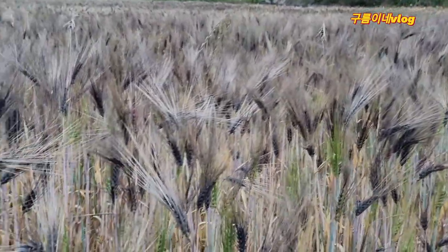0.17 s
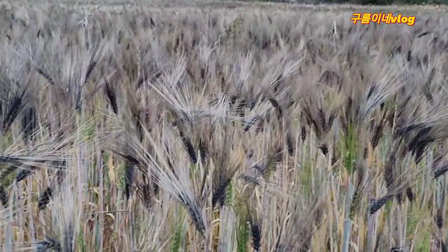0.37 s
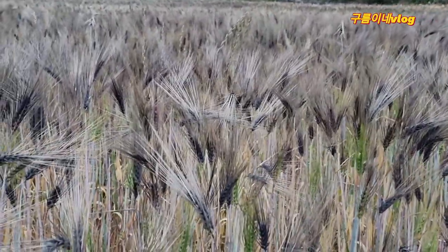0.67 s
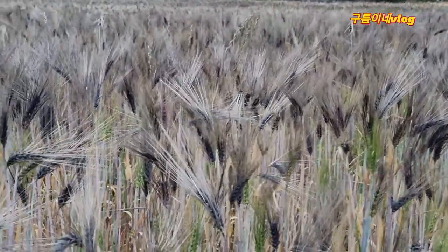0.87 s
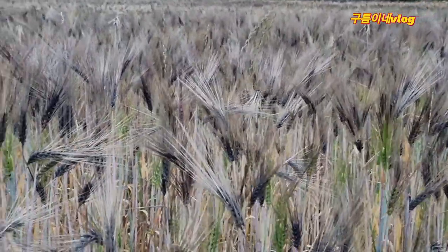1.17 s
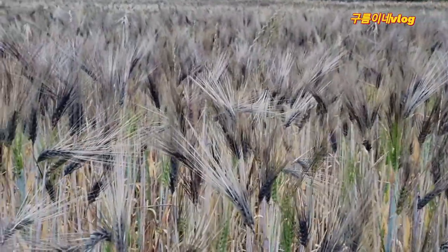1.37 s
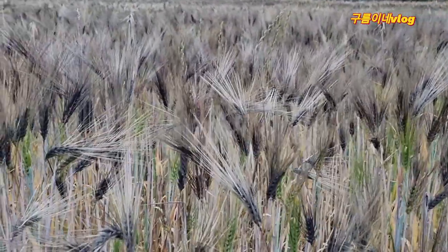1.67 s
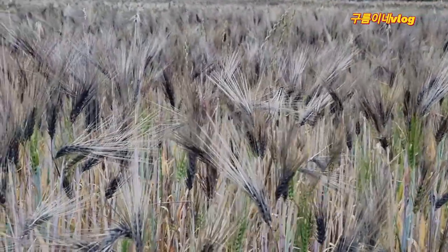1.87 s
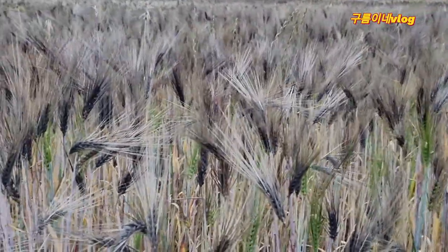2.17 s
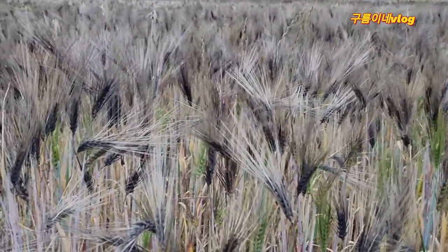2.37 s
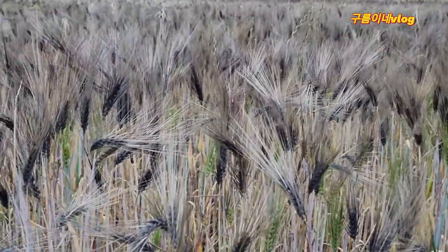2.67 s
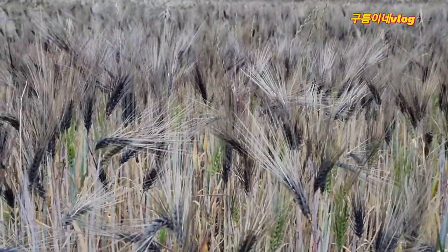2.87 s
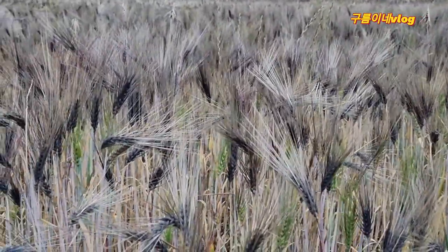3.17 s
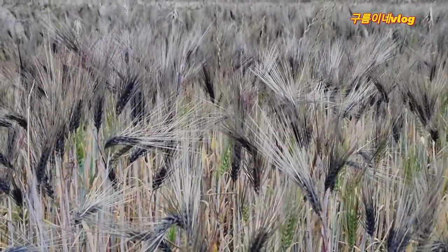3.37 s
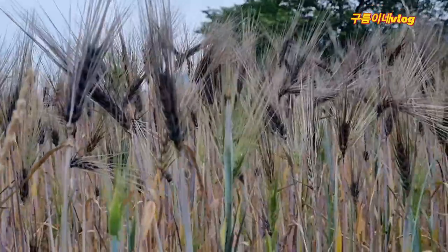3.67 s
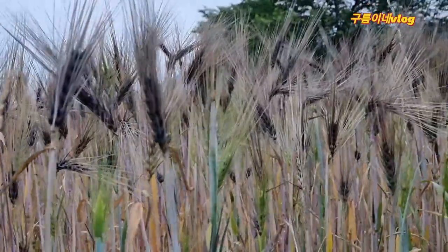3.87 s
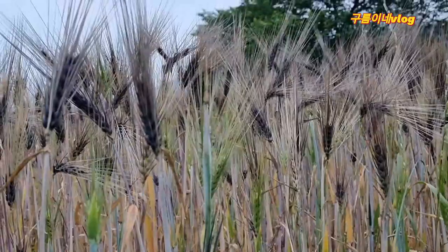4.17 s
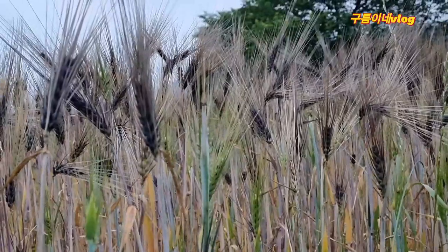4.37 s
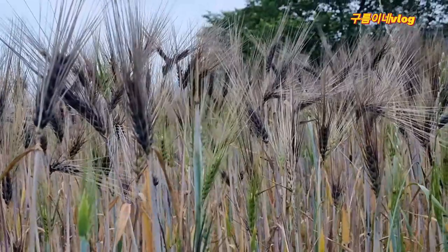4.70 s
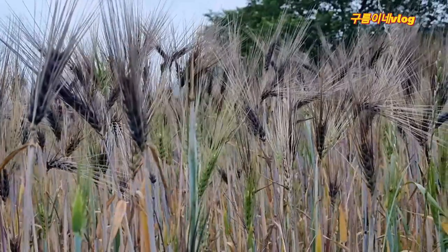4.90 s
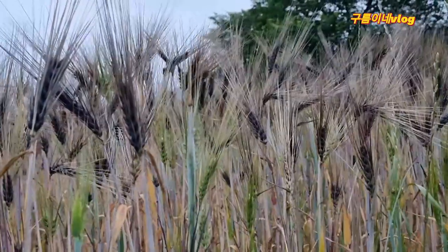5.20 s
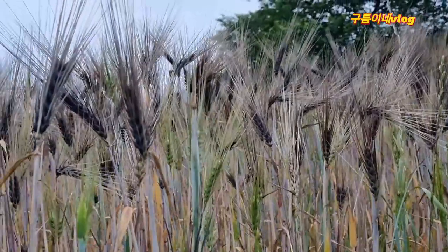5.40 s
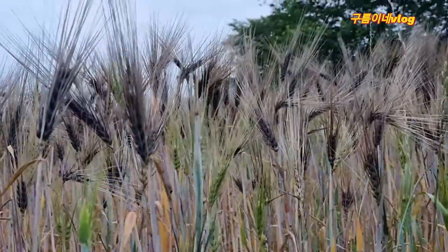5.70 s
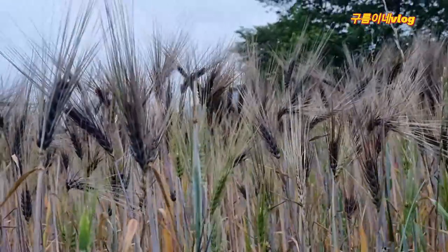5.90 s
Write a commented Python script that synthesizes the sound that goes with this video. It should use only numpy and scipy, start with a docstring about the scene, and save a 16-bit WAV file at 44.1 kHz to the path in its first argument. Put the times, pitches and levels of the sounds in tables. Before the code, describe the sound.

Low wind rumbles over hissing grain and faint bird chirps; distant road noise suddenly dulls, dry straw snaps, and the microphone housing gets knocked.

```python
"""A breezy barley field, heard from two spots: the open field first, then low among the stalks.
In the open a far road hums, wind rumbles on the microphone, ears hiss and small birds chirp at a distance.
A soft tap, a few dry snaps and one vehicle's singing tyres come early; then the road dulls, a low hum joins
and snaps grow more frequent. Near the end awns brush the microphone housing and something knocks it five times.
Shaped noise makes wind, road and hiss; gliding sines the birds; short impulses and damped rings the contacts."""
import sys
import numpy as np
from scipy import signal
from scipy.io import wavfile
from scipy.ndimage import uniform_filter1d

SR = 44100
rng = np.random.default_rng(int(sys.argv[2]) if len(sys.argv) > 2 else 0)


def put_to_file(sound):
    """Save the sound as 16-bit audio at rate SR, in the file named by the first command-line argument."""
    columns = np.atleast_2d(sound).T  # one column per channel
    safe = np.clip(columns, -1, 1)
    whole_steps = np.round(safe * 32767)
    wavfile.write(sys.argv[1], SR, whole_steps.astype(np.int16))


N = 266540
TIME = np.arange(N) / SR
MOVE_S = 3.55  # the listening spot changes here

# likeness of the two channels in the open: f/Hz, coherence (-1 to 1)
LIKENESS_OPEN = [(130, 0.96), (350, 0.81), (680, .62), (930, 0.91), (1280, 0.39), (1450, 0.18),
                 (1850, -0.39), (2650, 0.55), (3400, -0.53), (4600, -0.11), (16000, 0.022)]
# likeness of the two channels among the stalks: f/Hz, coherence (-1 to 1)
LIKENESS_LOW = [(60, .75), (270, 0.9), (500, 0.57), (1000, 0.36), (1300, 0.11), (1700, -0.48), (2500, 0.22),
                (3300, -0.37), (4500, -0.024), (16000, -0.14)]
# colour of one snap of dry straw: f/Hz, level/dB
SNAP_OF_STRAW = [(800, -25), (2200, -18), (3400, -3), (4800, -10), (6600, -3), (8200, -13), (12000, -11),
                 (16000, -19)]


def gain_of(db):
    """Decibels to amplitude."""
    return 10 ** (np.asarray(db) / 20)


def evened(x):
    """Scaled to rms 1."""
    return x / np.sqrt(np.mean(x ** 2) + 1e-20)


def read(points, hz):
    """A spectrum table read on a log-frequency axis."""
    f, value = np.transpose(points)
    return np.interp(np.log(hz + 1), np.log(f + 1), value)


def level(curve):
    """A dB curve over time as a gain for every sample."""
    return gain_of(np.interp(TIME, *np.transpose(curve)))


def panned(balance_db):
    """Left and right gains for a left-minus-right balance."""
    return gain_of(np.array([[balance_db], [-balance_db]]) / 2)


def add(mix, s, sound):
    """Mixes a stereo sound in at time s."""
    part = mix[:, round(s * SR):][:, :sound.shape[1]]
    part += sound[:, :part.shape[1]]


def by_spot(first, second):
    """An equal-power fade of 43 ms from the first spot's sound to the second's."""
    turn = np.clip((TIME - MOVE_S) / 0.043 + .5, 0, 1) * np.pi / 2
    return first * np.cos(turn) + second * np.sin(turn)


def wander(low_hz, high_hz):
    """An irregular drift of rms 1: sines at rates between the two, with random phases."""
    rates = np.geomspace(low_hz, high_hz, num=14)
    return evened(sum(np.sin(2 * np.pi * (rate * TIME + rng.random())) for rate in rates))


def click(colour, bright_db=0, size=512):
    """The minimum-phase impulse of this colour, with peak 1; bright_db tilts the top."""
    hz = abs(np.fft.fftfreq(size, 1 / SR))
    top_db = bright_db * np.clip((hz - 7000) / 3000, 0, 1)  # starts at 7 kHz, full from 10 kHz
    log_gain = np.log(gain_of(read(colour, hz) + top_db))
    pulse = np.fft.ifft(np.exp(np.conj(signal.hilbert(log_gain)))).real
    return pulse / abs(pulse).max()


def ring(hz, peak_s):
    """A damped ring that swells for peak_s and dies away."""
    t = np.arange(SR // 5) / SR
    return -np.sin(2 * np.pi * hz * t) * t / peak_s * np.exp(1 - t / peak_s)


def air(spectrum, likeness, patchy_db, size):
    """Stereo noise, mid channel at rms 1, whose spectrum swells and fades in small patches."""
    # the two ports colour the field differently: f/Hz, L-R level/dB
    port_tilt = [(300, 0), (1050, -0.5), (1900, 2.5), (2600, 1), (3000, -3.5), (3900, -3), (4700, -0.5),
                 (11500, .5), (14500, -2)]
    hz = np.fft.rfftfreq(size, 1 / SR)
    a, b, c, d, patches = rng.standard_normal((5, 4 * N // size + 5, len(hz)))
    patches = uniform_filter1d(patches, size=10, axis=0)  # smooth over time
    patches = evened(uniform_filter1d(patches, size=14, axis=1))  # and over frequency
    same = np.clip(read(likeness, hz), -1, 1)
    left = a + 1j * b
    right = same * left + np.sqrt(1 - same ** 2) * (c + 1j * d)
    tilt = gain_of(read(port_tilt, hz) / 2)
    z = np.array([left * tilt, right / tilt])
    z *= gain_of(read(spectrum, hz) + patchy_db * patches)
    x = signal.istft(z, nperseg=size, noverlap=size - size // 4, time_axis=1, freq_axis=2)[1][:, :N]
    return x / np.sqrt(np.mean(x.mean(0) ** 2))


def road():
    """Tyre noise from far away, swelling as one vehicle passes; mostly shut out among the stalks."""
    # traffic swells, then is screened by the crop: t/s, level/dB before a small lift
    traffic_level = [(0, -64.5), (.8, -64.5), (1.5, -66), (2.3, -64), (2.8, -63), (3.54, -63.5),
                     (3.57, -72.5), (5, -73), (6.04, -73.5)]
    # traffic colour in the open: f/Hz, relative level/dB per Hz
    open_colour = [(250, -50), (480, -15), (680, -13.5), (800, -7), (900, -0.5), (1090, -5.5), (1270, -3),
                   (1450, -15.5), (2000, -13), (3500, -40)]
    # traffic colour through the crop: f/Hz, relative level/dB per Hz
    low_colour = [(250, -39), (450, -8), (550, -3.5), (780, -10.5), (930, 3), (1300, -2), (1450, -11),
                  (2000, -9.5), (3500, -37)]
    # the passing vehicle: t/s at its nearest, time to half amplitude/s, level/dB at its nearest
    nearest_s, half_s, db = (3.15, 0.39, -65)
    # colour of its singing tyres: f/Hz, relative level/dB per Hz
    tyre_colour = [(600, -38), (810, -6.5), (890, 3), (980, -10), (1200, -30), (2000, -54)]
    traffic = by_spot(air(open_colour, LIKENESS_OPEN, patchy_db=0.93, size=2048),
                      air(low_colour, LIKENESS_LOW, patchy_db=0.5, size=2048))
    approach = gain_of(db) / (1 + ((TIME - nearest_s) / half_s) ** 2)
    song = approach * air(tyre_colour, LIKENESS_OPEN, patchy_db=1.0, size=4096)
    return gain_of(0.82) * level(traffic_level) * traffic + by_spot(song, 0)


def hum():
    """A low sine of wavering pitch, heard at the second spot only."""
    # the hum: f/Hz, level/dB, rms pitch waver/Hz
    hz, db, waver_hz = (58, -56, 2.3)
    pitch = hz + waver_hz * wander(low_hz=0.97, high_hz=12)
    tone = evened(np.sin(2 * np.pi * np.cumsum(pitch) / SR))
    return by_spot(0, gain_of(db) * panned(balance_db=1.0) * tone)


def chirp(length_s, start_hz, end_hz, depth_hz, trill_hz):
    """A gliding whistle of rms 1 with a fast, slightly uneven trill in pitch and loudness."""
    t = np.arange(round(length_s * SR)) / SR
    waver = evened(uniform_filter1d(rng.standard_normal(len(t)), size=100))
    trill_cycles = np.cumsum(trill_hz * (1 + 0.21 * waver)) / SR + rng.random()
    trill = np.sin(2 * np.pi * trill_cycles)
    hz = np.linspace(start_hz, end_hz, len(t)) + depth_hz * trill + 60 * waver
    whistle = np.sin(2 * np.pi * np.cumsum(hz) / SR)
    return evened(whistle * (1 + 0.2 * trill) * signal.windows.tukey(len(t), .6))


def birds():
    """Distant calls, no two alike, with a faint scatter from the crop and the trees."""
    # one bird's buzzy falling call in even runs: start t/s, end t/s, time between calls/s,
    # first level/dB and last level/dB against call_db, L-R level/dB
    runs = [(.145, 1.4, .279, 1, -1, -11), (1.535, 2.7, .26, -2, 0, -14), (2.9, 3.4, .32, -2.5, 2, -13),
            (3.755, 5.15, .317, -4, -9, 9), (5.25, 6.0, .311, -5, -3, 5)]
    # a second bird's quick upward whistles: t/s, level/dB
    flicks = [(.082, -79), (.183, -75), (.393, -75.5), (.503, -76.5)]
    # other birds' trills and peeps: t/s, length/s, start f/Hz, end f/Hz, trill depth/Hz, level/dB
    notes = [(1.356, 0.039, 2850, 2710, 380, -68), (1.528, .033, 4360, 4000, 200, -75),
             (1.96, .024, 5850, 5630, 80, -72), (3.329, 0.062, 4050, 4500, 520, -68.5),
             (3.423, 0.059, 4150, 4390, 620, -67), (3.46, 0.031, 5000, 5700, 150, -77)]
    call_db, call_scatter_db = -77.5, 2
    call_s, call_start_hz, call_end_hz = .08, 6400, 5690  # average call
    flick_s, flick_start_hz, flick_end_hz = .038, 3800, 7070
    out = np.zeros((2, N))
    for start, end, gap_s, first_db, last_db, balance_db in runs:
        times = np.arange(start, end, gap_s)
        for s, db in zip(times, np.linspace(first_db, last_db, len(times))):
            chance = rng.standard_normal(3) * [.1, .012, call_scatter_db]
            stretch, pitch, strength = chance + [1, 1, call_db + db]
            call = chirp(call_s * stretch, call_start_hz * pitch, call_end_hz * pitch,
                         depth_hz=222, trill_hz=138.2)
            add(out, s, gain_of(strength) * panned(balance_db) * call)
    for s, db in flicks:
        flick = chirp(flick_s, flick_start_hz, flick_end_hz, depth_hz=102.6, trill_hz=106)
        add(out, s, gain_of(db) * panned(balance_db=12.0) * flick)
    for s, length_s, start_hz, end_hz, depth_hz, db in notes:
        note = chirp(length_s, start_hz, end_hz, depth_hz, trill_hz=128)
        add(out, s, gain_of(db) * panned(balance_db=2.0) * note)
    t, t60 = np.arange(SR // 3) / SR, .2  # t60: seconds for the scatter to fall 60 dB
    scatter = rng.standard_normal((2, len(t))) * gain_of(-60 * t / t60)
    scatter /= np.linalg.norm(scatter[0])
    return out + gain_of(-6) * signal.fftconvolve(out, scatter, axes=1)[:, :N]


def wind():
    """Eddies press on the microphone: big ones rumble, small ones flutter, both swell with each gust."""
    # wind colour in the open: f/Hz, relative level/dB per Hz
    open_colour = [(15, -13.5), (26, 0), (37, -16.5), (56, 1.5), (100, -6.5), (130, -8), (200, -13.5),
                   (280, -21.5), (450, -26.5), (900, -55.5)]
    # wind colour among the stalks: f/Hz, relative level/dB per Hz
    low_colour = [(15, -1), (26, -7), (38, -21), (58, -5), (80, 0), (115, -11.5), (175, -13), (260, -24.5),
                  (340, -24.5), (450, -40.5), (900, -74)]
    # stronger buffets: t/s, rise/dB of the rumble
    buffets = [(1.488, 10), (2.42, 2.5), (3.96, 4.5), (4.22, 2)]
    buffet_s = 0.015  # time from the top of a buffet to 1/e of its rise in dB
    # levels before the gusts
    rumble_open_db, rumble_low_db, flutter_open_db, flutter_low_db = -57, -57, -71.5, -66
    flutter_follows, flutter_scatter_db = .6, 1.2  # share of the gust's dB, own rms drift
    # a little harder on the left in the open
    eddies = by_spot(air(open_colour, LIKENESS_OPEN, patchy_db=1.0, size=4096) * panned(balance_db=0.9),
                     air(low_colour, LIKENESS_LOW, patchy_db=0.0, size=4096))
    big = signal.sosfiltfilt(signal.butter(4, 150, fs=SR, output="sos"), eddies)
    gust_db = .5 * wander(low_hz=2, high_hz=12)
    gust_db += sum(db * np.exp(-((TIME - s) / buffet_s) ** 2) for s, db in buffets)
    flutter_db = flutter_follows * gust_db + flutter_scatter_db * wander(low_hz=3, high_hz=20)
    rumble = by_spot(gain_of(rumble_open_db), gain_of(rumble_low_db)) * evened(big)
    flutter = by_spot(gain_of(flutter_open_db), gain_of(flutter_low_db)) * evened(eddies - big)
    return rumble * gain_of(gust_db) + flutter * gain_of(flutter_db)


def barley():
    """Countless awns blend into a hiss of noise; the nearest ones crackle one by one as impulses."""
    # breeze through the barley: t/s, hiss level/dB
    breeze = [(0, -68), (1.1, -66.5), (2.85, -66), (3.2, -68), (3.85, -66.5), (4.15, -68.5), (4.6, -68.5),
              (5.5, -69), (6.04, -67)]
    # hiss colour in the open: f/Hz, relative level/dB per Hz
    open_colour = [(600, -1.5), (1600, 2), (2100, 1.5), (2700, 3), (3100, -2), (3600, 1), (4800, 1),
                   (5300, -2.5), (6400, -5), (7500, -11), (8400, -21.5), (9400, -14), (11200, -14),
                   (13500, -7), (16000, -13.5)]
    # hiss colour among the stalks: f/Hz, relative level/dB per Hz
    low_colour = [(600, 4.5), (1400, 2), (1750, 4), (2700, 4), (3200, -0.5), (4600, -1.5), (5300, -8),
                  (6700, -9), (7700, -14), (11200, -14.5), (13500, -12), (16000, -10.5)]
    hiss = by_spot(air(open_colour, LIKENESS_OPEN, patchy_db=1.5, size=512),
                   air(low_colour, LIKENESS_LOW, patchy_db=1.64, size=512))
    touches_per_s = 60
    strength_db = 6.7 * np.minimum(rng.exponential(1, N), 3.5)  # mostly weak, a few strong
    touches = (rng.random(N) < touches_per_s / SR) * gain_of(strength_db)
    side = rng.random(N) * np.pi / 2
    spread = touches * np.array([np.cos(side), np.sin(side)])
    crackle = signal.oaconvolve(spread, click(SNAP_OF_STRAW, bright_db=4)[None], axes=1)[:, :N]
    return level(breeze) * (hiss + gain_of(-6.5) * crackle)


def stalks():
    """Each snap is a millisecond of tiny fractures in dry straw; faint ones fall at random at spot two."""
    # nearest stalks snapping together: t/s, relative strength/dB, brightness/dB (see click), L-R level/dB
    near = [(2.4468, -47.5, 2, 3), (2.8083, -45, 26.5, 2), (2.853, -52, 21, -2), (3.5768, -50.5, -21, -7),
            (3.7093, -38, -15, -4), (3.7972, -42.5, -12, -3), (3.8122, -51, 4, -6), (3.9484, -42, -17, -3),
            (4.7554, -40, -17, 0), (5.127, -53, 0, 3), (5.7097, -51, 0, 7), (5.918, -46, 7, 3)]
    faint_per_s, faint_db, faint_bright_db = 4, -58, 4
    faint_scatter_db = 1.5  # of strength, brightness and balance alike
    out, t = np.zeros((2, N)), np.arange(SR // 100) / SR
    times = TIME[(rng.random(N) < faint_per_s / SR) & (TIME > MOVE_S)]
    middle = [faint_db, faint_bright_db, 0]
    faint = [(s, *(middle + faint_scatter_db * rng.standard_normal(3))) for s in times]
    for s, db, bright_db, balance_db in list(near) + faint:
        fractures = rng.standard_normal((2, len(t))) * np.exp(-t / 0.00084)
        snap = signal.fftconvolve(fractures, click(SNAP_OF_STRAW, bright_db)[None], axes=1)
        snap /= np.linalg.norm(snap, axis=1, keepdims=True)  # equal energy for every snap
        add(out, s, gain_of(db + 7.5) * panned(balance_db) * snap)
    return out


def tap():
    """One soft, dead tap by the left port: a single ring damped within milliseconds."""
    # the tap: t/s, level/dB before panning, f/Hz
    s, db, hz = (1.3394, -52.5, 610)
    out = np.zeros((2, N))
    add(out, s, gain_of(db) * panned(balance_db=24) * ring(hz, peak_s=.0005))
    return out


def brushing():
    """Awns catch and slip along the housing in a fine, dense crackle that swells with pressure."""
    # brushes around the knocks: t/s at the strongest, time to 1/e amplitude/s, level/dB before flicker
    brushes = [(5.155, 0.12, -76), (5.68, 0.034, -74.5), (5.878, 0.1, -75)]
    # colour of one catch: f/Hz, level/dB
    catch_colour = [(1500, -30), (4000, -10), (6500, -3), (9000, 3), (11500, -2), (14000, 4), (16000, -8)]
    catches_per_s = 700
    catches = (rng.random((2, N)) < catches_per_s / SR) * rng.standard_normal((2, N))
    crackle = evened(signal.oaconvolve(catches, click(catch_colour)[None], axes=1)[:, :N])
    pressure = sum(gain_of(db) * np.exp(-((TIME - s) / half_s) ** 2) for s, half_s, db in brushes)
    flicker = gain_of(3.0 * wander(low_hz=8, high_hz=50))
    return panned(balance_db=1.5) * pressure * flicker * crackle


def knocks():
    """The contact leans on the housing, snaps and shoves it, with a low ringing.

    The right port feels it weaker, with the lean, low ringing and shove inverted."""
    # knocks: t/s, strength/dB, shell f/Hz, then against the strength: shell level/dB,
    # snap level/dB (before a fixed cut), and the snap's brightness/dB (see click)
    blows = [(5.169, -23, 507, -7, -0.5, -2), (5.272, -22.5, 408, 2, 2, 6.5),
             (5.5784, -22, 380, 0.5, -1, -0.5), (5.9027, -23, 424, 0.5, 4.5, 6),
             (5.958, -21, 450, 1, -3.5, 3)]
    # low ringing with each knock: f/Hz, level/dB against the strength, time to the peak/s
    low_rings = [(65.9, -2, 0.012), (159, -12.5, 0.0049)]
    # a short higher ring of the shell: f/Hz, level/dB against the strength, time to the peak/s
    rim_hz, rim_db, rim_s = (1010, -28, 0.00089)
    # colour of the snap: f/Hz, level/dB
    snap_colour = [(300, 0), (900, 12.5), (1200, -3.5), (1700, -2), (2600, 2.5), (4700, -1.5), (6200, -9),
                   (7500, -12.5), (11000, -18.5), (14000, -16.5), (16000, -13)]
    # how far lean, low ringing and shell start ahead of the snap
    lean_s, low_lead_s, flex_s = 0.0078, 0.0037, 0.00058
    shove_lag_s, shove_s = 0.00047, 0.0052  # the shove follows the snap, and lasts this long
    cross_s = 0.00079  # the flex travels from the left port to the right one
    out, t = np.zeros((2, N)), np.arange(-SR // 20, SR // 20) / SR
    ports = np.array([[1], [-gain_of(-11.5)]])
    low_ringing = sum(gain_of(db) * ring(hz, peak_s) for hz, db, peak_s in low_rings)
    for s, db, shell_hz, shell_db, snap_db, bright_db in blows:
        blow = gain_of(db) * ports
        add(out, s - lean_s, blow * gain_of(-15) * np.hanning(round(lean_s * SR)))
        add(out, s - low_lead_s, blow * low_ringing)
        add(out, s + shove_lag_s, -blow * gain_of(-0.5) * np.hanning(round(shove_s * SR)))
        # the shell flexes at the left port first and reaches the right one later and weaker
        shell = gain_of(db + shell_db) * ring(shell_hz, peak_s=0.0012)
        shell += gain_of(db + rim_db) * ring(rim_hz, rim_s)
        add(out, s - flex_s, np.outer([1, 0], shell))
        add(out, s - flex_s + cross_s, np.outer([0, gain_of(-10.5)], shell))
        # one sharp slip amid smaller ones, with a faint rub before and after
        small_slips = gain_of(-20) * np.exp(-abs(t - .0002) / 0.00069)
        rub = gain_of(-35) * np.exp(-abs(t) / 0.01)
        slips = rng.standard_normal((2, len(t))) * (small_slips + rub)
        slips[:, t == 0] = 1
        snap = signal.fftconvolve(slips, click(snap_colour, bright_db)[None], axes=1)
        add(out, s + t[0], -gain_of(db + snap_db - 9.0) * panned(balance_db=15) * snap)
    return out


def scene():
    """Everything that reaches the microphone."""
    field = road() + hum() + birds() + wind() + barley() + stalks()
    return field + tap() + brushing() + knocks()


def record(dry):
    """The recorder's band limit: a steep linear-phase low-pass."""
    edge_hz = 15850
    low_pass = signal.firwin(511, edge_hz, window=("kaiser", 9), fs=SR)
    return signal.oaconvolve(dry, low_pass[None], "same")


dry = scene()
out = record(dry)
put_to_file(out)
```